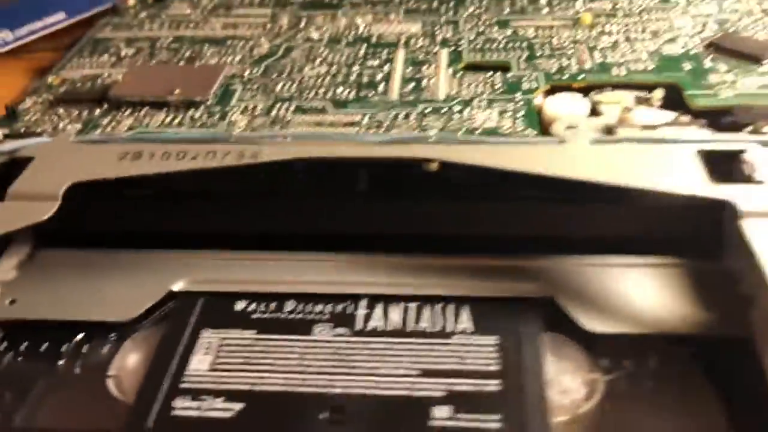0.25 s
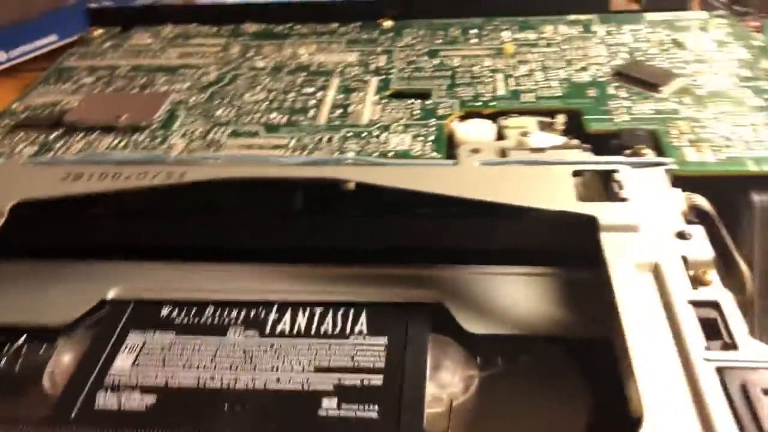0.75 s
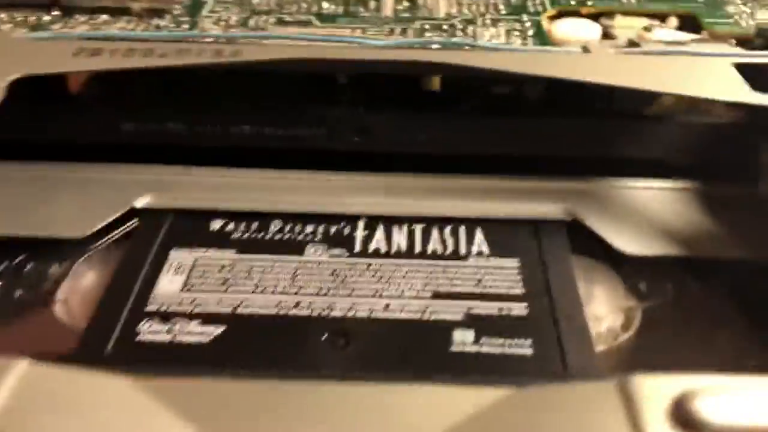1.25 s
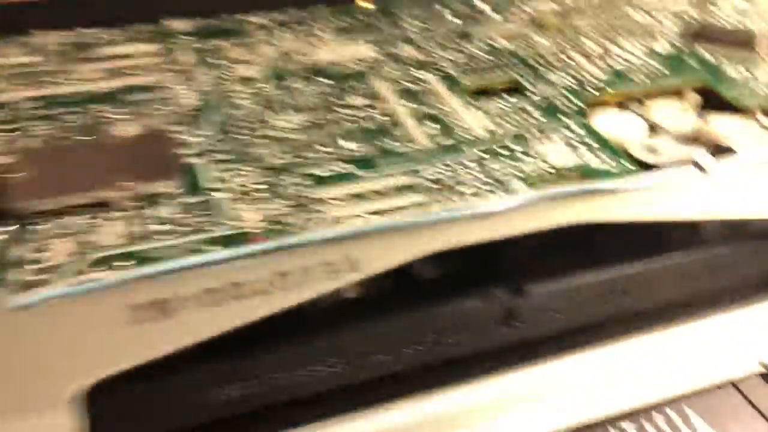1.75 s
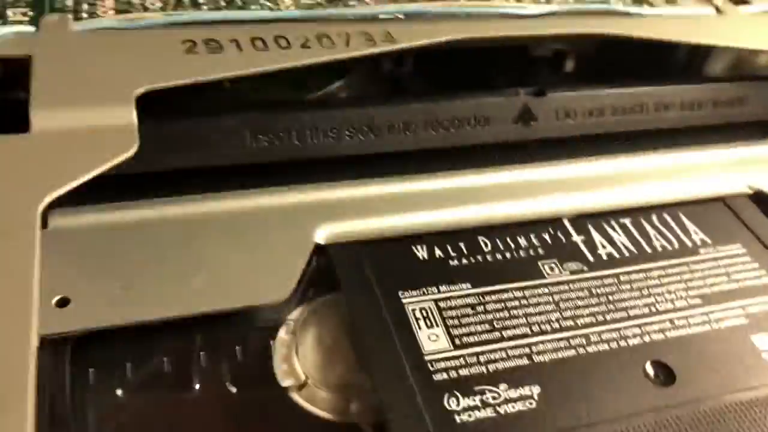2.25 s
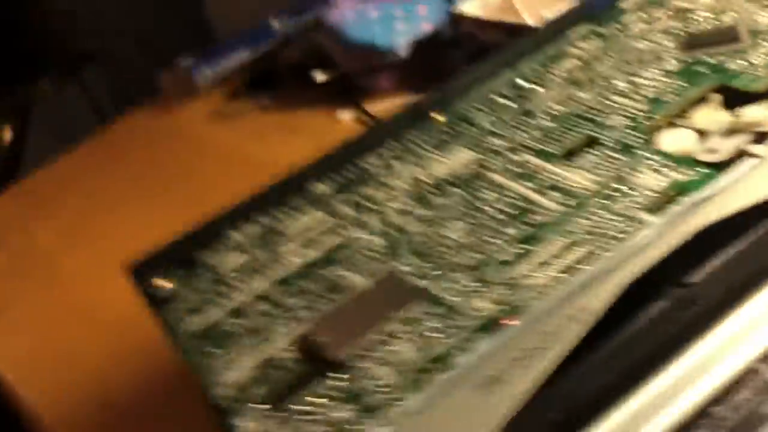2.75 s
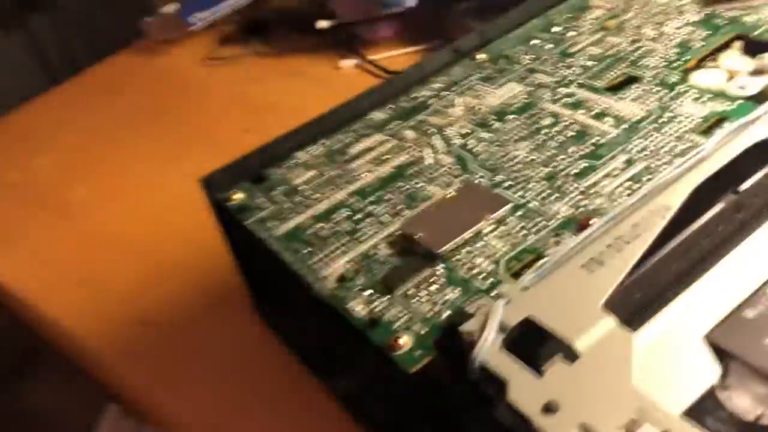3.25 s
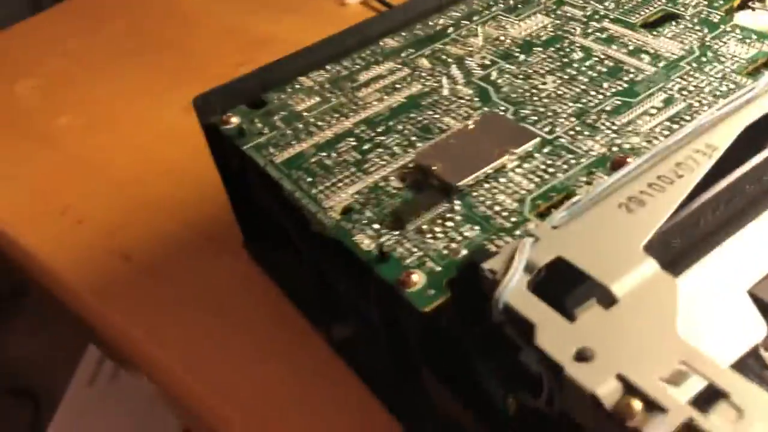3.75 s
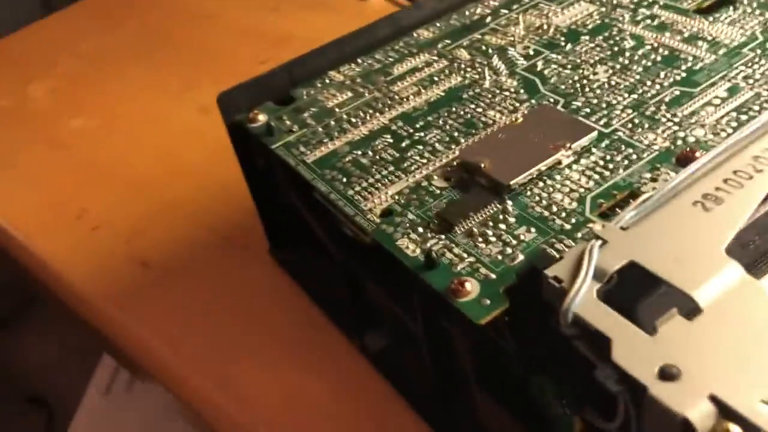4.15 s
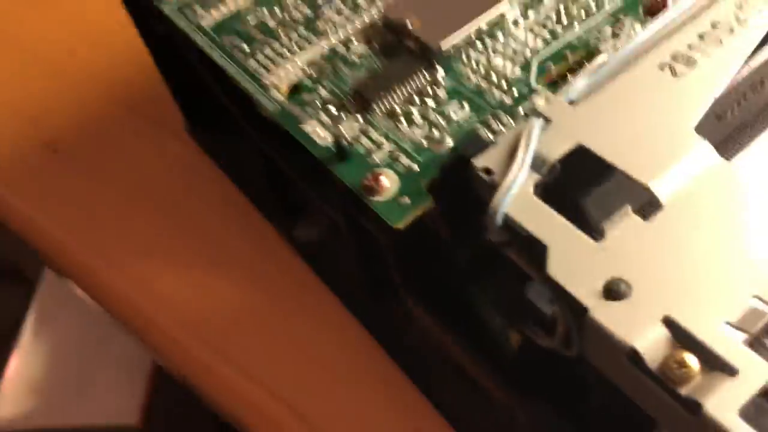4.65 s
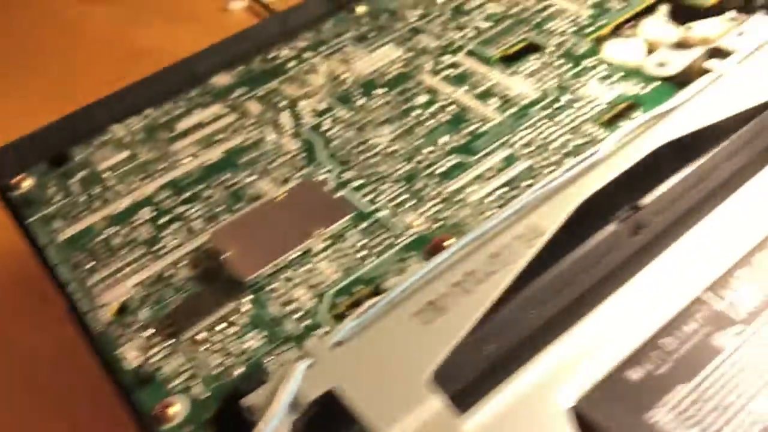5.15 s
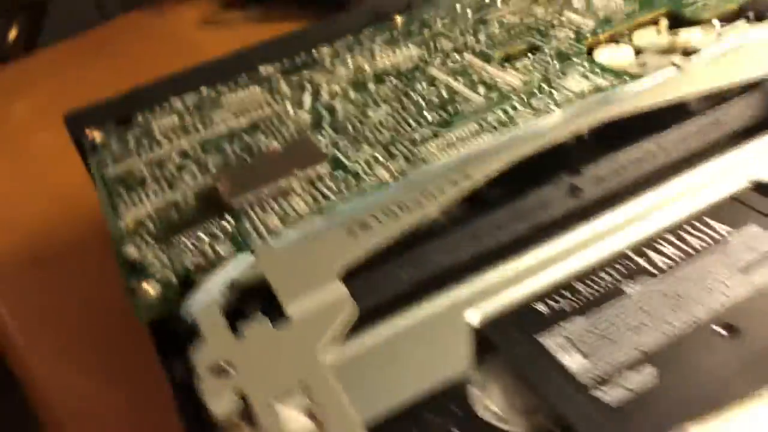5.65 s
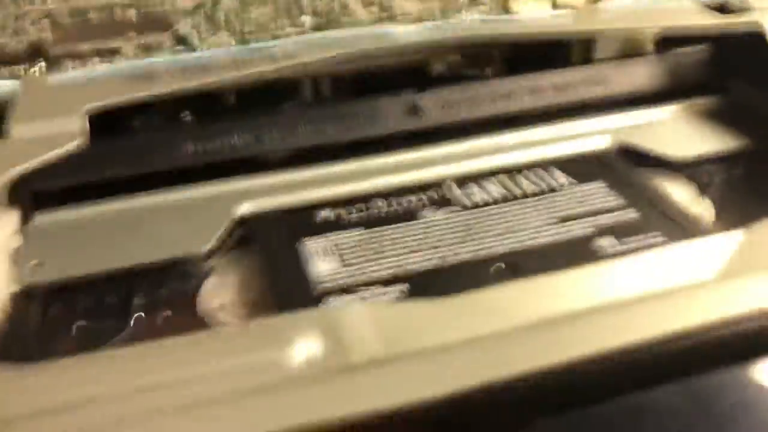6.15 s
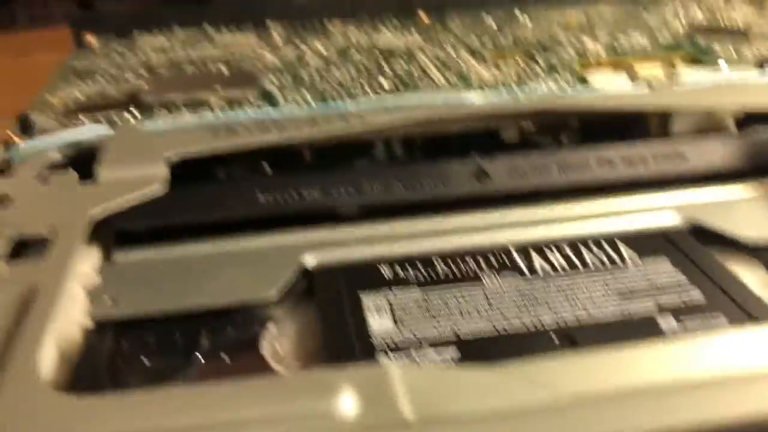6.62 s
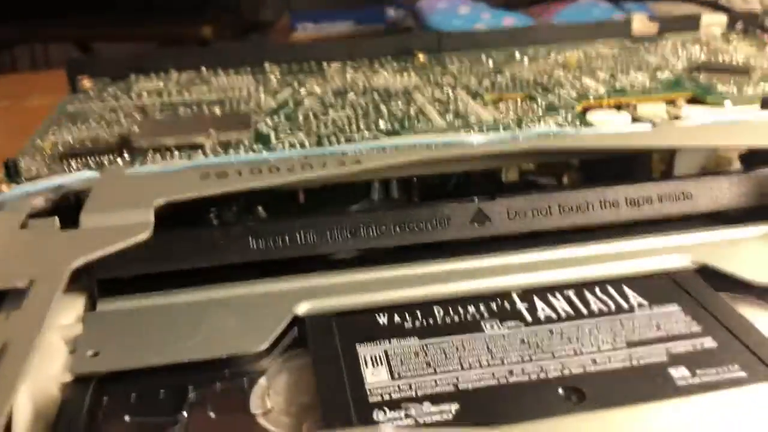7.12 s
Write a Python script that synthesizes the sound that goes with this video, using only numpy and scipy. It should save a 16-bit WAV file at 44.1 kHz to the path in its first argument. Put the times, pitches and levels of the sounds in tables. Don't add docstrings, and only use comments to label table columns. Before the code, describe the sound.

Close to the microphone, an open tape machine hums faintly while plastic clicks, rough rubbing builds to a hard clanging blow, then sparse taps fade out.

```python
import sys
import numpy as np
from scipy import signal
from scipy.fft import rfft, irfft, next_fast_len
from scipy.io import wavfile
from scipy.ndimage import uniform_filter1d, map_coordinates

SR = 44100
rng = np.random.default_rng(int(sys.argv[2]) if len(sys.argv) > 2 else 0)


def natural_amplitude(level_db):
    exponent = np.asarray(level_db, float) / 20
    return 10 ** exponent


def generate_wav(signal):
    frames = np.transpose(np.atleast_2d(signal))
    scaled = np.clip(frames, -1, 1) * 32767
    pcm = np.round(scaled).astype(np.int16)
    wavfile.write(sys.argv[1], SR, pcm)


N = 325546
T = np.arange(N) / SR


def unit(x):
    return x / np.sqrt(np.mean(x ** 2) + 1e-20)


def along(points, hz):
    f, v = np.transpose(points)
    return np.interp(np.log(hz + 1), np.log(f + 1), v)


def wobble(rate, size=N):
    knots = rng.standard_normal(int(N * rate / SR) + 4)
    return map_coordinates(knots, [T[:size] * rate])


def filtered(x, response):
    m = next_fast_len(len(x) + 4096)
    return irfft(rfft(x, m) * response(np.fft.rfftfreq(m, 1 / SR)), m)[:len(x)]


def resonance(hz, width_hz):
    return lambda f: 1j * f * width_hz / (hz * hz - f * f + 1j * f * width_hz)


def noise_band(size, hz, width_hz, order=2):
    noise = rng.standard_normal(size)
    return unit(filtered(noise, lambda f: resonance(hz, width_hz)(f) ** order))


def sinking(t, end_hz, cycles, fall):
    return np.sin(2 * np.pi * (end_hz * t + cycles * (1 - np.exp(-t / fall))))


def rush(spectrum, patchy_db, grit_db):
    grains = rng.standard_normal(N) * natural_amplitude(grit_db * wobble(rate=1100))
    z = signal.stft(grains, nperseg=512)[2]
    field = uniform_filter1d(rng.standard_normal(z.shape), size=6, axis=0)
    field = uniform_filter1d(field, size=6, axis=1)
    x = signal.istft(z * natural_amplitude(patchy_db * unit(field)), nperseg=512)[1][:N]
    return unit(filtered(x, lambda hz: natural_amplitude(along(spectrum, hz))))


def dying(t60s, size):
    hz, t, z = signal.stft(rng.standard_normal(size), SR, nperseg=256)
    decay = natural_amplitude(-60 * t / along(t60s, hz)[:, None])
    return signal.istft(z * decay, SR, nperseg=256)[1][:size]


def add(track, s, sound):
    part = track[round(s * SR):][:len(sound)]
    part += sound[:len(part)]


# (frequency [Hz], density [dB per Hz])
FLOOR_SPECTRUM = [(14, -41), (30, -10.5), (120, -1.5), (280, -8.5), (600, -19), (1760, -26.5),
                  (6000, -36.5), (16000, -41.5)]


def air():
    level_db = -61.5 + 0.54 * wobble(rate=1.8)
    return natural_amplitude(level_db) * rush(FLOOR_SPECTRUM, patchy_db=1.5, grit_db=0.3)


# (multiple of the turn, level [dB rms])
HUM_HARMONICS = [(2, -67), (3, -71), (4, -58.5), (6, -68.5), (7, -72), (8, -72.5), (9, -77.5), (11, -85.5),
                 (12, -77)]


def drum():
    turn_hz, sway_db = 30.02, .7
    turn = 2 * np.pi * np.cumsum(turn_hz * (1 + .001 * wobble(rate=3))) / SR
    out = np.zeros(N)
    for k, db in HUM_HARMONICS:
        level = np.sqrt(2) * natural_amplitude(db + sway_db * wobble(rate=5))
        out += level * np.sin(k * turn + 2 * np.pi * rng.random())
    return out


# (frequency [Hz], t60 [s])
ROOM_T60 = [(200, .25), (2000, .2), (10000, .12)]


def room(x):
    tail = dying(ROOM_T60, size=SR // 2)
    delayed = np.pad(x, (300, 0))
    return signal.fftconvolve(delayed, tail / np.linalg.norm(tail))[:N]


# (time [s], pressure [dB], speed [dB over the usual])
GRIP_MOTION = [(0, -72, -1), (.35, -87, 1), (.6, -74, 1), (2.25, -68.5, 0), (2.55, -68, -2),
               (2.85, -72, -0.5), (3.1, -74.5, 0), (3.5, -86.5, -6), (3.8, -74, -0.5), (4.25, -72, 0),
               (4.799, -72, -2.5), (5.05, -74, -2.5), (5.45, -71, -2.5), (5.7, -74, -3), (6.0, -74, 3.5),
               (6.27, -69.5, -0.5), (6.699, -78, -5), (7.38, -78, 5)]
# (time [s], pressure [dB], speed [dB over the usual])
HAND_PUSHES = [
    [(.668, -57, -5.5), (.73, -48, -6.5), (.745, -43, 1), (.872, -38, 2.5), (.966, -39, 3), (1.03, -36, 3),
     (1.146, -42.5, 0), (1.2, -48.5, 0), (1.27, -59, -2)],
    [(1.27, -61, -9.5), (1.31, -53.5, 0), (1.372, -46.5, 2.5), (1.474, -37.5, 3), (1.512, -39.5, -0.5),
     (1.55, -40, -3.5), (1.575, -34.5, -0.5), (1.61, -38, 0)],
    [(1.66, -36.5, 1.5), (1.726, -37, 0), (1.77, -39.5, 2.5), (1.838, -45.5, -4), (1.91, -45, 0.5),
     (1.99, -42.5, 0), (2.03, -46.5, -2), (2.06, -53, -6.5), (2.3, -66, -3)],
]
# (time [s], length [s], pressure [dB], speed [dB over the usual])
SHORT_RUBS = [(0.0, 0.04, -63, 11), (0.051, 0.027, -63, -5), (0.361, 0.1, -42.5, -4),
              (0.587, 0.026, -60, 2), (2.258, 0.028, -47.5, -3.5), (2.3, 0.33, -64, 2.5),
              (2.562, 0.11, -61.5, 3.5), (2.629, 0.069, -46.5, -4), (2.669, 0.1, -56, -7.5),
              (2.834, 0.039, -80.5, 14), (3.266, .05, -73.5, 5), (3.386, 0.031, -63, -8.5),
              (3.776, .08, -74, -1), (3.944, 0.2, -50.5, -1.5), (3.998, 0.062, -51, 2),
              (4.109, 0.08, -54.5, -5.5), (4.287, 0.35, -60.5, -1.5), (4.348, 0.13, -56.5, -0.5),
              (4.395, 0.051, -59.5, -5.5), (4.48, 0.14, -68.5, -12), (4.564, 0.097, -48, -6.5),
              (4.862, 0.13, -65.5, -0.5), (4.936, 0.068, -56.5, -6), (5.636, .2, -82.5, 12.5),
              (6.317, 0.034, -70, -5.5), (6.534, 0.078, -73.5, -10), (6.724, 0.35, -80, 10.5),
              (7.225, 0.13, -65, 3)]


def contact(layer_db, per_speed):
    s, db, speed = np.transpose(GRIP_MOTION)
    gain = natural_amplitude(np.interp(T, s, db + per_speed * speed) + 1.2 * wobble(rate=9))
    for rows in HAND_PUSHES:
        s, db, speed = np.transpose(rows)
        gain += natural_amplitude(np.interp(T, s, db + per_speed * speed, left=-150, right=-150))
    t = np.arange(SR // 2) / SR
    catch = 1 - np.exp(-t / 0.0069)
    for s, length, db, speed in SHORT_RUBS:
        fade_db = 23 * (t / length) ** 1.1
        add(gain, s, natural_amplitude(db + per_speed * speed - fade_db) * catch)
    return natural_amplitude(layer_db) * gain


# (frequency [Hz], density [dB per Hz])
WOOD_SPECTRUM = [(40, -28), (70, -6.5), (150, 4.5), (260, 2), (400, -28.5)]
# (time [s], level [dB], t60 [s])
DESK_SHUDDERS = [
    (1.61, -27, 0.3),
    (1.88, -45, 0.32),
    (4.57, -56, 0.35),
]


def desk():
    shaken = contact(layer_db=-14, per_speed=-1.5)
    t = np.arange(SR // 2) / SR
    for s, db, t60 in DESK_SHUDDERS:
        add(shaken, s, natural_amplitude(db - 60 * t / t60) * (1 - np.exp(-t / 0.0067)))
    return shaken * rush(WOOD_SPECTRUM, patchy_db=2.0, grit_db=-0.5)


# (time [s], peak [dB], shell mode [Hz], tick [dB], thump [dB])
SHELL_CLICKS = [(0.0128, -34.5, 440, -7.5, -14.5), (0.0613, -38, 295, -21, -9),
                (2.9972, -20.5, 494, -26.5, -22.5), (3.0375, -52, 455, -5, -11),
                (3.0607, -39.5, 510, -6.5, -14), (3.085, -47.5, 480, -15, -28),
                (3.4024, -44.5, 410, -7.5, -16), (3.4324, -44.5, 447, -9.5, -20),
                (4.541, -47.5, 770, -5, -31), (5.062, -48, 500, -18, -10), (5.117, -43, 420, -23.5, -14.5),
                (5.471, -52, 533, -10.5, -8), (5.909, -57, 427, -9.5, -10), (6.2835, -53.5, 410, -1, -15.5),
                (6.3022, -58.5, 2070, -12, -13.5), (6.491, -41.5, 633, -11, -15)]


def clicks():
    out, t = np.zeros(N), np.arange(SR // 8) / SR
    swell = 1 - np.exp(-(t / 0.00061) ** 2)
    shell_t60, crack_t60, thump_t60 = 0.021, 0.0079, 0.091
    for s, db, hz, tick_db, thump_db in SHELL_CLICKS:
        noise = rng.standard_normal(len(t))
        crack = unit(filtered(noise, lambda f: resonance(2800, 2600)(f) + .15 * resonance(9000, 9000)(f)))
        shell = natural_amplitude(1 - 60 * t / shell_t60) * sinking(t, hz, 0.74, 0.00072)
        edge = natural_amplitude(tick_db + 4.5 - 60 * t / crack_t60) * crack
        thump = natural_amplitude(thump_db + 11.5 - 60 * t / thump_t60) * sinking(t, 44, 2.0, 0.0037)
        add(out, s, natural_amplitude(db) * (swell * (shell + thump) + edge))
    return out


# (time [s], length [s], centre [Hz], width [Hz], level [dB])
SKIN_DRAGS = [(.012, 0.043, 12500, 6000, -57), (.05, .011, 5000, 5000, -61),
              (6.455, 0.039, 4500, 3500, -62), (7.217, 0.0186, 7700, 4000, -48),
              (7.215, .021, 14800, 2500, -53), (7.22, .015, 4900, 1000, -55),
              (4.538, .012, 5000, 10000, -55), (4.348, 0.0205, 2500, 1800, -54.5),
              (2.65, 0.007, 5300, 4200, -53), (2.7, .014, 5200, 900, -63),
              (4.984, 0.0194, 1900, 2600, -56.5), (6.69, 0.0075, 2200, 2500, -64.5),
              (7.325, .02, 2700, 4000, -68), (5.31, .12, 2500, 900, -77), (5.5, 0.053, 3900, 3000, -67.5),
              (6.205, .02, 3000, 4000, -66.5)]


def drags():
    out, t = np.zeros(N), np.arange(SR // 7) / SR
    for s, length, hz, width_hz, db in SKIN_DRAGS:
        build = np.clip(t / length, 0, 1) ** 0.65
        release = natural_amplitude(-60 * np.clip(t - length, 0, 1) / .006)
        jerks_db = 1.9 * wobble(rate=250, size=len(t))
        add(out, s, natural_amplitude(db + jerks_db) * build * release * noise_band(len(t), hz, width_hz))
    return out


# (time [s], length [s], pitch [Hz], level [dB])
SQUEAK_TONES = [
    (1.2615, 0.014, 2260, -45),
    (1.549, 0.04, 6560, -37),
    (1.628, 0.074, 54.7, -27),
    (2.053, 0.075, 793, -49),
    (4.939, 0.034, 140, -35),
    (4.972, 0.036, 133, -41),
    (6.494, 0.049, 61, -47),
    (7.214, 0.07, 61, -46.5),
]
# (time [s], length [s], centre [Hz], width [Hz], level [dB])
BRUSH_STROKES = [(0.852, 0.082, 4620, 2500, -38.5), (1.0, 0.074, 2600, 2000, -40),
                 (1.612, 0.054, 430, 199, -26.5), (1.615, 0.065, 143, 60, -34),
                 (2.257, 0.016, 3700, 9600, -44.5), (2.999, 0.024, 3500, 4000, -64),
                 (3.38, 0.027, 3000, 10010, -64.5), (4.107, 0.029, 7100, 11100, -57),
                 (4.985, 0.041, 5500, 9000, -60.5), (5.31, 0.077, 6500, 5810, -70),
                 (5.495, 0.072, 9900, 11960, -63.5), (5.905, 0.056, 3600, 5900, -63),
                 (6.19, 0.11, 11940, 8000, -71), (6.44, 0.071, 5240, 7060, -68),
                 (6.479, 0.015, 5500, 6000, -56), (7.212, .025, 7300, 10140, -63)]
# (time [s], length [s], centre [Hz], width [Hz], level [dB])
NOISY_SQUEALS = [
    (2.045, .155, 790, 330, -48),
    (2.082, .08, 1090, 200, -52),
    (6.536, .05, 850, 110, -60),
]


def squeaks():
    out, t = np.zeros(N), np.arange(SR // 4) / SR
    for s, length, hz, db in SQUEAK_TONES:
        pitch = hz * (1 + min(.07, 60 / hz) * wobble(rate=120, size=len(t)))
        chatter_db = min(3.5, hz / 200) * wobble(rate=150, size=len(t))
        tone = np.sin(2 * np.pi * np.cumsum(pitch) / SR)
        swell = np.sin(np.pi * np.clip(t / length, 0, 1) ** 1.1)
        add(out, s, natural_amplitude(db + chatter_db) * tone * swell)
    for s, length, hz, width_hz, db in BRUSH_STROKES + NOISY_SQUEALS:
        swell = np.sin(np.pi * np.clip(t / length, 0, 1) ** .8)
        add(out, s, natural_amplitude(db) * noise_band(len(t), hz, width_hz) * swell)
    return out


# (frequency [Hz], density [dB per Hz])
DRONE_SPECTRUM = [(150, -35.5), (300, -4), (500, 2), (900, 0.5), (1300, -2.5), (2200, -29.5)]
SCRAPE_SPECTRUM = [(700, -26), (1300, -2), (2000, -1), (3000, -5.5), (4800, -10), (8000, -27.5)]
CLOTH_SPECTRUM = [(2500, -30.5), (5000, 0), (7000, 0), (11000, -9), (16000, -4.5)]
# (frequency [Hz], width [Hz])
CASE_MODES = [(862, 30), (2696, 6.9), (4287, 39), (6240, 44), (6340, 34)]


def sliding():
    stutter_db = .4 * wobble(rate=13) + 1.0 * wobble(rate=85)
    drone = contact(layer_db=-1, per_speed=-1.46) * natural_amplitude(1.25 * stutter_db)
    drone *= rush(DRONE_SPECTRUM, patchy_db=2.0, grit_db=0.0)
    scrape = contact(layer_db=0, per_speed=0) * natural_amplitude(0.87 * stutter_db)
    scrape *= rush(SCRAPE_SPECTRUM, patchy_db=1.3, grit_db=2.5)
    rustle = contact(layer_db=-9, per_speed=1.6) * natural_amplitude(1.3 * stutter_db)
    rustle *= rush(CLOTH_SPECTRUM, patchy_db=2.2, grit_db=1.5)

    def case(f):
        return 0.89 + 0.36 * sum(resonance(hz, width_hz)(f) for hz, width_hz in CASE_MODES)

    return filtered(drone + scrape, case) + rustle


# (time [s], centre [Hz], width [Hz], level [dB], t60 [s])
EDGE_SNAPS = [(.7375, 5000, 6000, -35, .03), (1.5175, 3500, 5000, -31, 0.027),
              (1.264, 1500, 2000, -46.5, .03), (4.0037, 2400, 3000, -33, .022),
              (4.003, 7500, 6000, -46, .02), (4.1095, 7500, 6000, -45, .025),
              (4.5305, 1100, 1200, -44, .02), (4.9312, 2000, 1203, -39, .012),
              (4.9365, 1800, 900, -41, .025), (4.94, 1500, 1500, -52, .16), (6.302, 2499, 1800, -53, .03),
              (6.454, 1100, 1500, -56, .12), (2.651, 3500, 4000, -45, .04), (3.936, 3000, 6000, -60, .1),
              (1.545, 2000, 2000, -37, .03), (4.5715, 4500, 4000, -51, .04), (4.5662, 1200, 900, -31, .018),
              (1.719, 2000, 2500, -32, .035), (2.6265, 6500, 5000, -38, .02)]


def snaps():
    out, t = np.zeros(N), np.arange(SR // 7) / SR
    rise = 1 - np.exp(-t / .0005)
    for s, hz, width_hz, db, t60 in EDGE_SNAPS:
        ragged_db = 2 * wobble(rate=260, size=len(t))
        add(out, s, natural_amplitude(db + ragged_db - 60 * t / t60) * rise * noise_band(len(t), hz, width_hz))
    return out


# (time [s], pitch [Hz], level [dB], rise [s], t60 [s])
PART_RINGS = [(.3595, 2374, -22.5, 0.00077, 0.028), (.3595, 3950, -29, 0.00089, 0.028),
              (.363, 1473, -20.5, 0.0024, 0.065), (.412, 496, -40, .005, .07),
              (.709, 873, -25, .001, 0.058), (.7155, 797, -27, .002, .02), (.671, 1157, -37, .003, .04),
              (1.614, 520, -23, 0.002, 0.04), (1.624, 472, -14, 0.0027, 0.052),
              (1.626, 880, -13.5, 0.0022, 0.062), (1.845, 400, -30, .002, 0.067),
              (1.852, 542, -34, 0.0051, 0.12), (1.888, 601, -25.5, 0.0014, 0.037),
              (1.891, 245, -28, 0.003, 0.065), (1.983, 850, -37.5, .004, 0.092),
              (2.9955, 2300, -36, 0.0004, 0.008), (2.996, 1100, -38, .001, 0.021),
              (2.9952, 5500, -44, .0003, 0.006), (2.998, 560, -42, .001, 0.048),
              (3.014, 3000, -52, .0004, .006), (3.946, 2300, -44, .006, .12),
              (3.968, 1530, -40, .004, 0.09), (3.994, 1300, -39, 0.0018, .016),
              (4.004, 2190, -35, 0.00079, 0.025), (4.106, 1690, -37, .001, 0.029),
              (4.111, 1100, -36, 0.0022, 0.037), (4.112, 1750, -41, .001, 0.024),
              (4.153, 520, -46, 0.0048, 0.059), (4.57, 592, -40, 0.0029, 0.11),
              (4.575, 1145, -41.5, .004, 0.17), (4.9317, 1790, -41, .0005, 0.03),
              (4.934, 441, -45, 0.003, 0.14), (6.539, 830, -52, .002, 0.16),
              (1.518, 1050, -21, .0015, .035), (1.521, 2720, -33, .002, .03),
              (5.061, 7000, -58, .0005, .012), (4.016, 6000, -46, .002, .02)]
# (time [s], pitch [Hz], level [dB], rise [s], t60 [s])
SQUAWK_SLIPS = [
    (2.057, 770, -28.5, 0.0075, 0.082),
    (2.078, 790, -28, 0.003, .04),
    (2.094, 774, -30, 0.0035, 0.047),
    (2.103, 834, -26, .002, 0.032),
    (2.112, 792, -32, 0.0055, 0.078),
    (2.128, 817, -34, 0.0033, 0.1),
    (2.16, 682, -35.5, 0.0037, 0.087),
]
# (time [s], pitch [Hz], level [dB], rise [s], t60 [s])
MORE_PART_RINGS = [(0.0127, 6000, -29.5, 0.00016, 0.0045), (0.0135, 1010, -40, 0.00094, 0.014),
                   (1.8435, 856, -25, .001, 0.035), (2.263, 1000, -41, 0.0027, 0.027),
                   (2.263, 2170, -54, 0.0037, 0.018), (2.6268, 1510, -35, 0.0011, 0.014),
                   (2.632, 900, -39, .003, 0.046), (2.69, 904, -42, .003, 0.053),
                   (4.004, 5900, -46, .001, .02), (4.111, 3700, -43.5, .001, 0.023),
                   (4.355, 1590, -42, .003, 0.046), (4.403, 750, -49, .003, .03),
                   (4.465, 600, -39, 0.0026, 0.048), (4.497, 900, -45, .003, .04),
                   (4.531, 1100, -42, 0.0018, 0.022), (4.544, 800, -48, 0.0022, .02),
                   (4.568, 450, -30, 0.002, 0.074), (4.59, 1100, -40.5, .003, 0.037),
                   (6.2835, 4600, -53.5, .0004, .01), (6.3025, 3000, -53.5, 0.00042, .01),
                   (6.461, 1660, -60, 0.0041, 0.043), (0.7372, 4200, -32.5, .001, .03),
                   (1.263, 895, -47, .004, .05), (1.518, 4400, -28, 0.00092, .02),
                   (1.522, 790, -31, .002, .03), (1.575, 620, -27, .003, .05),
                   (3.061, 1150, -44, 0.00062, .012), (3.389, 1254, -54, .002, 0.043),
                   (3.4027, 1400, -43, .0004, .007), (3.4322, 3300, -41, .0004, .006),
                   (3.434, 1504, -45, .0006, .01), (4.569, 750, -25, .001, .014),
                   (4.938, 1654, -43, .001, 0.017), (4.976, 2200, -54, .001, .04),
                   (4.99, 1600, -51.5, .002, .03), (4.998, 2400, -51.5, .002, .03),
                   (6.302, 2100, -56, .001, .025), (6.328, 910, -57, .003, .05), (7.222, 300, -50, .003, .06)]


def rings():
    out, t = np.zeros(N), np.arange(SR // 6) / SR
    for s, hz, db, rise, t60 in PART_RINGS + SQUAWK_SLIPS + MORE_PART_RINGS:
        pitch = hz * (1 + .03 * np.sin(2 * np.pi * (70 * t + hz * s)))
        tone = np.sin(2 * np.pi * np.cumsum(pitch) / SR)
        add(out, s, natural_amplitude(db - 60 * t / t60) * (1 - np.exp(-(t / rise) ** 2)) * tone)
    return out


# (time [s], peak [dB], ring [Hz], tick [dB], thump [dB])
DECK_TAPS = [(0.359, -20.5, 1624, -0.5, -22), (0.6, -49.5, 796, -26.5, -15), (0.667, -43, 1130, -41, 0),
             (0.709, -34, 807, -24, -7), (0.737, -35.5, 907, 4, -2), (1.287, -41, 1010, -15, -12),
             (1.545, -32, 1180, -15, -6), (1.574, -35, 700, -18, 2), (1.844, -32.5, 860, -25.5, 4),
             (1.886, -32, 1220, -12.5, -4), (2.678, -39.5, 890, -13.5, -1), (2.709, -42.5, 668, -30.5, 1),
             (4.0035, -38, 1144, -12, -16), (4.151, -46, 403, -37, -3), (4.303, -55, 833, 4, -14),
             (4.401, -47, 790, -26, -13), (4.462, -37, 980, -36, -11), (4.493, -44.5, 915, -44, -13),
             (4.5666, -30, 797, -36, -29), (6.117, -56.5, 594, -16.5, 1), (7.224, -54, 1550, -7.5, -5)]
# (time [s], peak [dB], ring [Hz], tick [dB], thump [dB])
THIN_EDGES = [
    (0.3962, -33, 1510, 1, -9),
    (1.5178, -24.5, 950, -6, -10),
    (2.6269, -32.5, 1390, 4, -7.5),
    (2.6512, -43.5, 1490, -18, -5),
    (3.9449, -55, 2328, -20, -18.5),
    (4.105, -39, 1117, -22, -26),
    (4.3555, -50, 1650, -23.5, -20),
    (4.932, -50, 1300, -36, 1),
]


def taps():
    out, t = np.zeros(N), np.arange(SR // 5) / SR
    rise = 1 - np.exp(-t / 0.00087)
    for contacts, t60 in [(DECK_TAPS, 0.049), (THIN_EDGES, .042)]:
        for s, db, hz, tick_db, thump_db in contacts:
            rattle = noise_band(len(t), 1.45 * hz, 2.1 * hz, order=3)
            ring = 2.0 * sinking(t, hz, 0.53, 0.0017) + 1.7 * rattle
            body = natural_amplitude(-7.5 - 60 * t / t60) * ring
            edge = natural_amplitude(tick_db - 5.5 - 60 * t / (0.69 * t60)) * noise_band(len(t), 7500, 12000)
            thump = natural_amplitude(thump_db - 3 - 60 * t / .06) * sinking(t, 220, 1.5, .004)
            add(out, s, natural_amplitude(db) * rise * (body + edge + thump))
    return out


# (time [s], level [dB])
HARD_BLOW = (1.6064, -24.5)
# (frequency [Hz], level [dB], t60 [s])
CHASSIS_MODES = [(430, -2, 0.1), (950, -4, 0.11), (1100, -11.5, 0.19), (1310.5, -4, 0.18), (1670, -8, 0.46),
                 (2120, -6, 0.21), (2350, 0, 0.098), (2708, -14, 0.078), (3700, -19.5, 0.26),
                 (3747, -12, 0.14), (6000, -21.5, 0.15), (6000, -13, 0.28), (6100, -11, 0.12),
                 (7900, -27, 0.24)]
# (frequency [Hz], density [dB per Hz])
CRASH_SPECTRUM = [(60, -13), (200, -20), (450, -3.5), (1000, -9), (2000, -5), (4000, -10.5), (8000, -14.5),
                  (16000, -21.5)]
# (frequency [Hz], t60 [s])
CRASH_DECAY = [(100, 0.9), (400, 0.13), (1000, 0.39), (3000, 0.2), (10000, 0.14)]


def blow():
    out, t = np.zeros(N), np.arange(SR // 2) / SR
    ring = np.zeros(len(t))
    for hz, db, t60 in CHASSIS_MODES:
        ring += natural_amplitude(db - 60 * t / t60) * np.sin(2 * np.pi * (hz * t + rng.random()))
    flex = (t / .0045) ** 2 * np.exp(-t / .0022) * sinking(t, 1250, 7, .0065)
    crash = filtered(dying(CRASH_DECAY, size=len(t)), lambda hz: natural_amplitude(along(CRASH_SPECTRUM, hz)))
    rise = 1 - np.exp(-(t / .0032) ** 2)
    rattle_db = .7 * wobble(rate=140, size=len(t))
    s, db = HARD_BLOW
    add(out, s, natural_amplitude(db) * rise * (natural_amplitude(-5.5) * ring + natural_amplitude(rattle_db) * unit(crash)))
    add(out, s, natural_amplitude(7.5) * flex)
    return out


def scene():
    deck = rings() + taps() + blow()
    background = air() + drum() + natural_amplitude(-22.0) * room(deck) + desk()
    handling = clicks() + drags() + squeaks() + sliding() + snaps()
    return (background + handling + deck)[None]


def low_pass(x):
    return signal.sosfilt(signal.butter(12, 17010, fs=SR, output="sos"), x)


def record(dry):
    band = lambda hz: (hz < 16150) * (1j * hz / (38 + 1j * hz)) ** 2
    return low_pass(filtered(dry[0], band)[None])


dry = scene()
out = record(dry)
generate_wav(out)
```